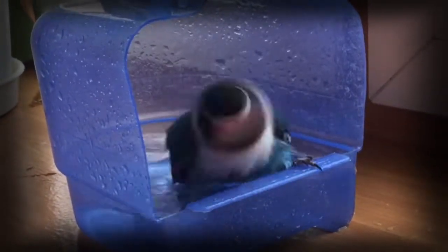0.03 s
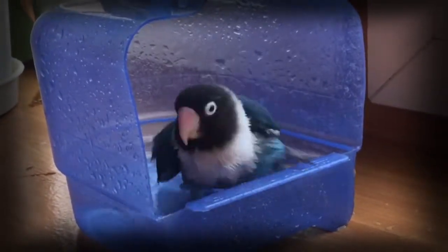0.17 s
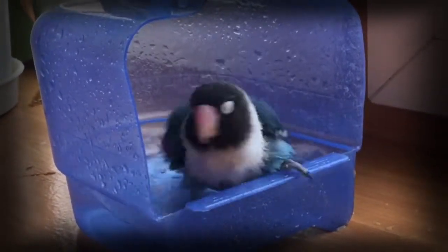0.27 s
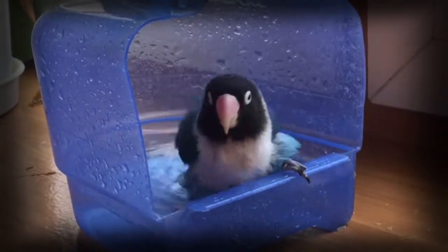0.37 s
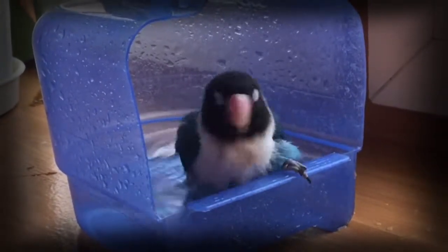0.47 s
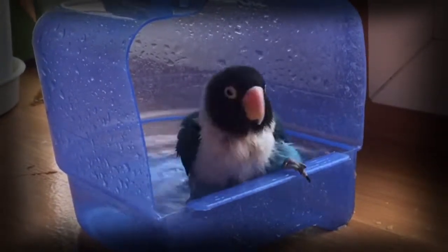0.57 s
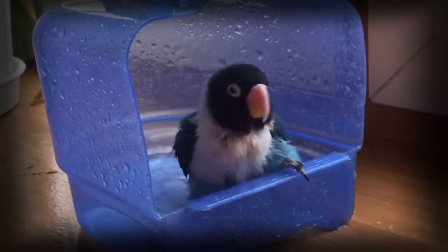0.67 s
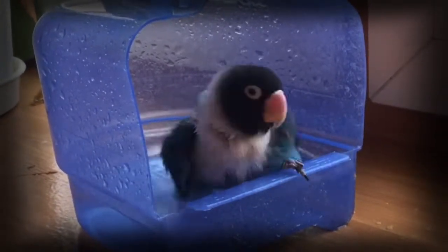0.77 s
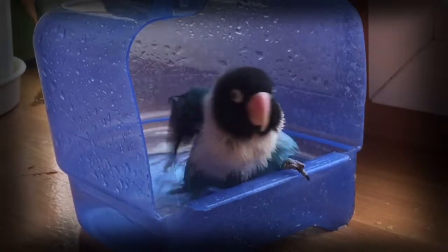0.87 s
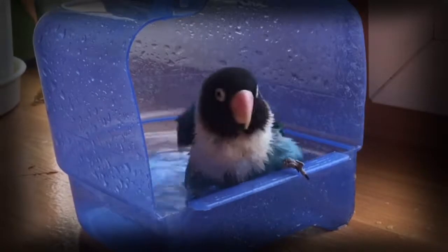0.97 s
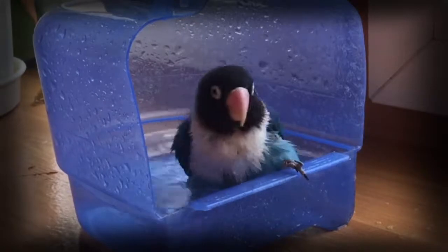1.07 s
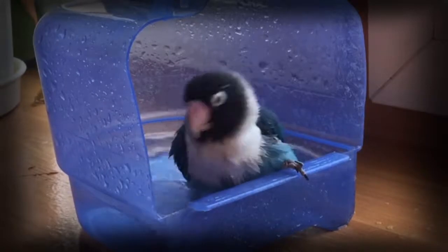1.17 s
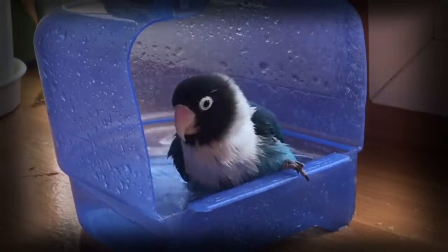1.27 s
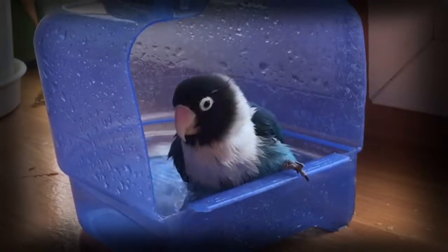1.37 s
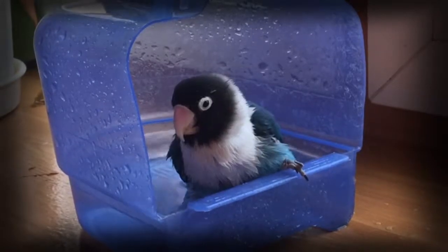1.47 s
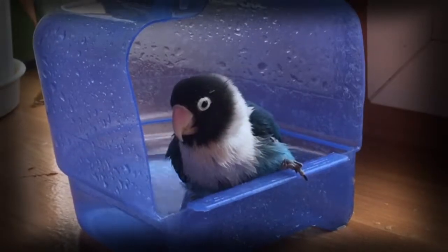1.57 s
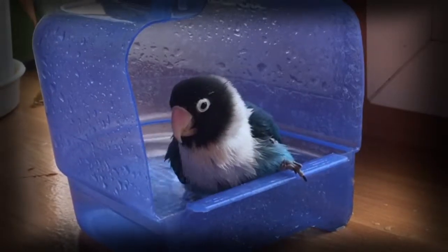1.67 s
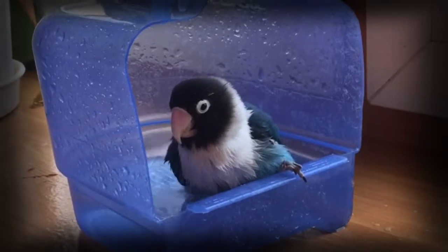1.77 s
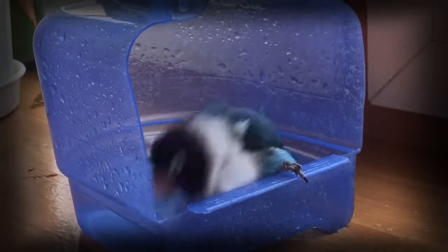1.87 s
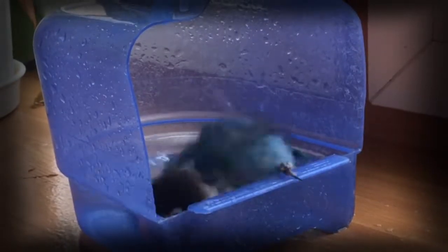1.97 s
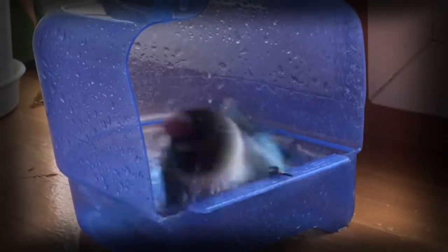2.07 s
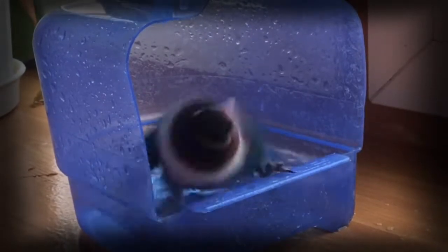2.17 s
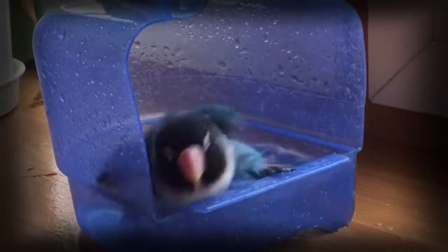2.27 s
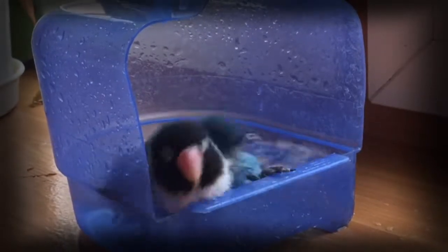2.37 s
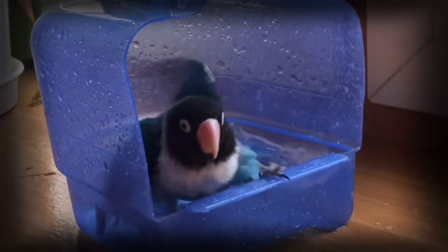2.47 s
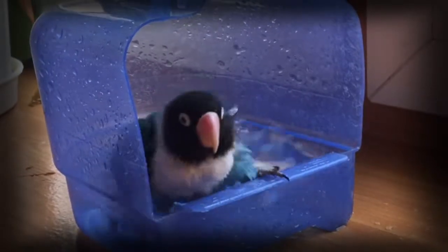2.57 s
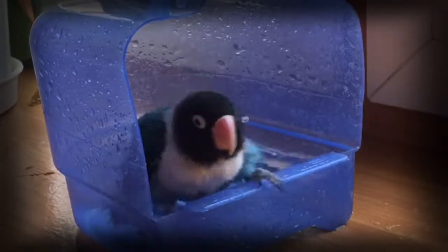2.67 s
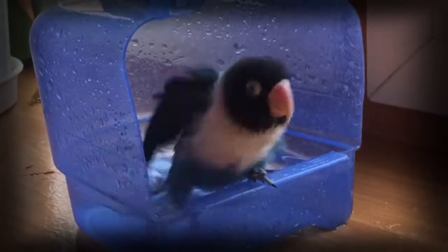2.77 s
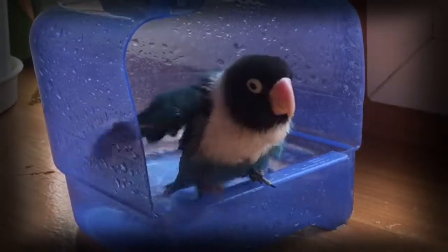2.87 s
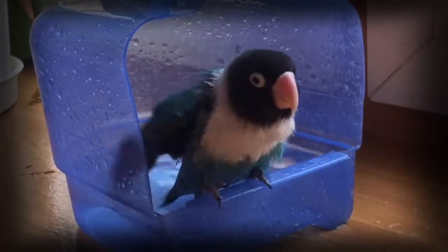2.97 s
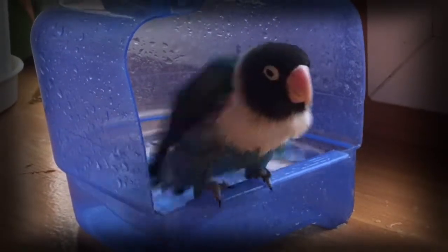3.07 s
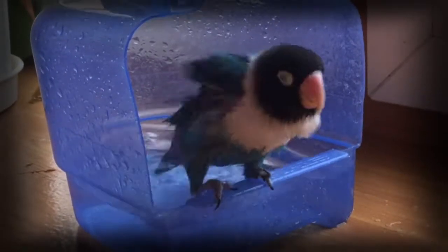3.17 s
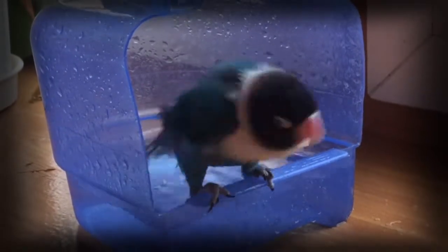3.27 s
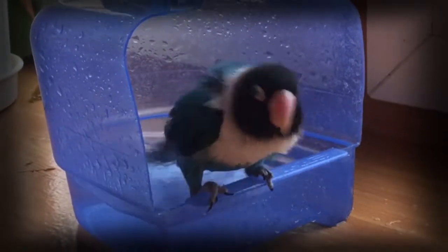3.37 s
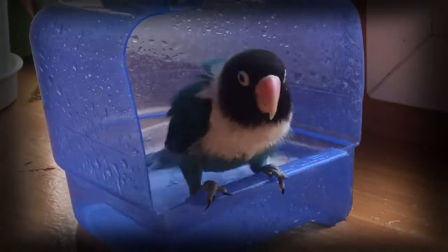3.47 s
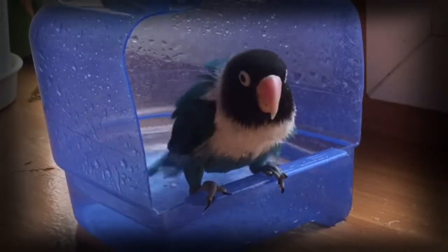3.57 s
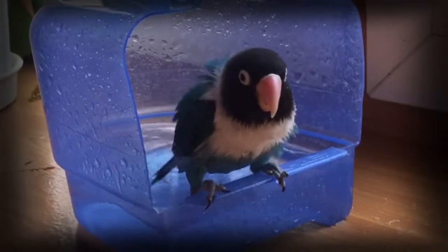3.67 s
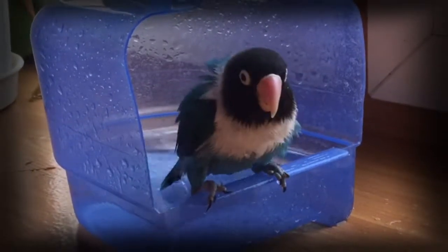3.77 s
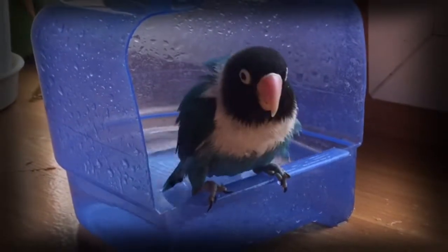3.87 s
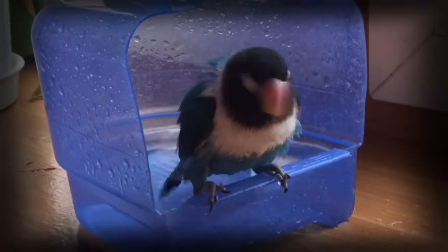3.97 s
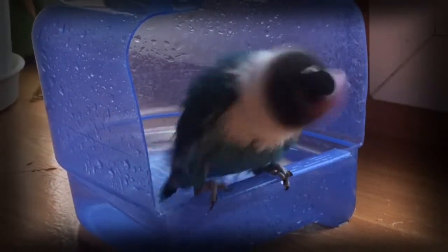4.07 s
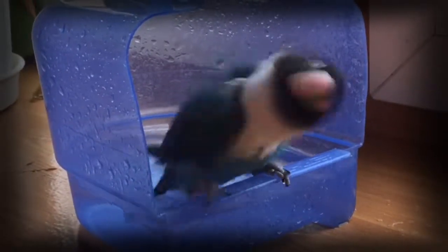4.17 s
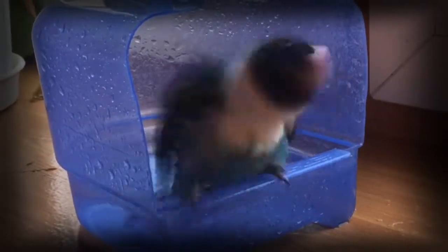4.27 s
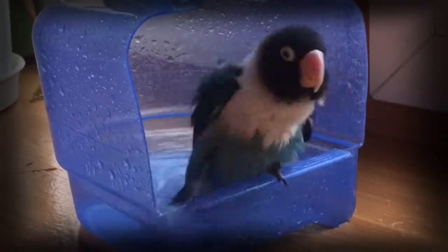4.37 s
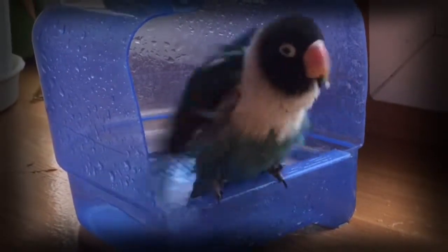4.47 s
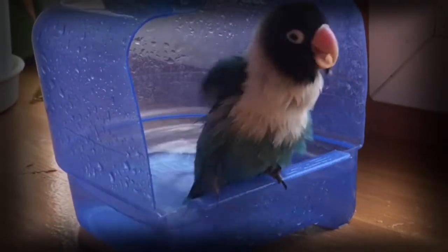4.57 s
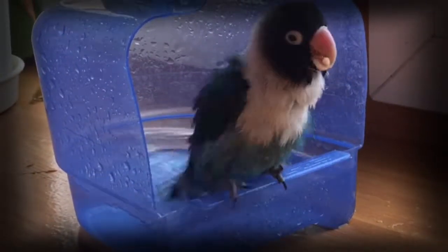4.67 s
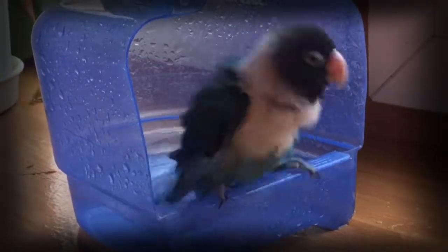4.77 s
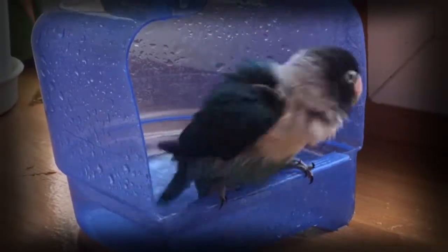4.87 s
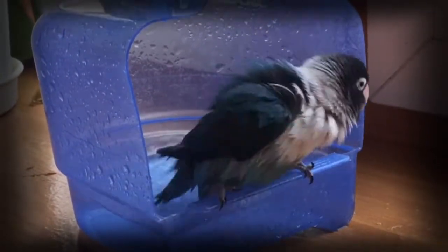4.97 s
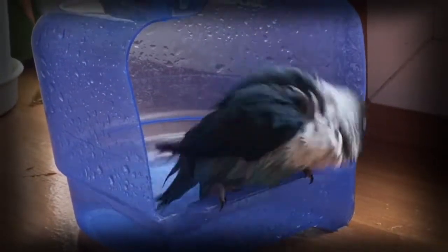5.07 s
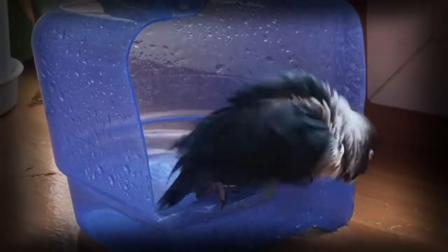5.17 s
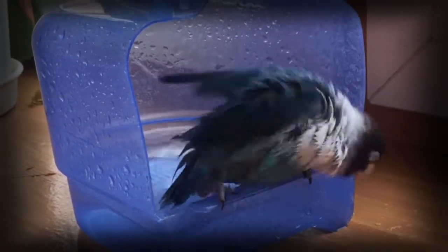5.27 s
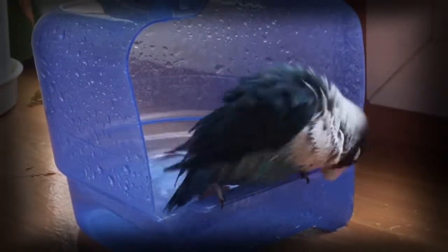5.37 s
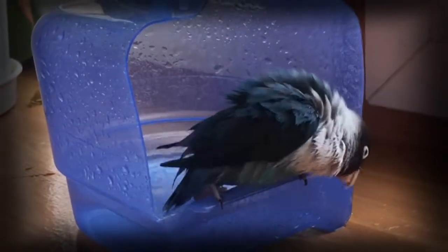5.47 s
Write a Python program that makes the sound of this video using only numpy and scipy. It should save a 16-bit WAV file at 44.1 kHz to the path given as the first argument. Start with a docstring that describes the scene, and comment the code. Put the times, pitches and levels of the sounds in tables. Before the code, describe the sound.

Short bursts of wet flapping and hollow plastic knocks from a bathing pet bird, over faint steady room hum and hiss.

```python
"""A quiet room hums and hisses, with soft thuds through the floor, as a small pet bird bathes
in a hooded plastic tub. Bumps ring the shell as decaying modes; wet slaps and shaken feathers
are noise bursts that fling bright spray; drops plink as short rising bubble tones.
Slosh and patter are lumpy noise that follows the bird's stirring."""
import sys
import numpy as np
from scipy import signal
from scipy.fft import rfft, irfft, next_fast_len
from scipy.io import wavfile
from scipy.ndimage import map_coordinates

SR = 44100
rng = np.random.default_rng(int(sys.argv[2]) if len(sys.argv) > 2 else 0)


def materialize(psi):
    """Save the field psi as 16-bit PCM at rate SR to the path in sys.argv[1].

    A 1-D psi becomes a single channel; in a 2-D psi each row is a channel.
    """
    bounded = np.clip(np.atleast_2d(psi).T, -1, 1)
    quanta = np.round(bounded * 32767).astype(np.int16)
    wavfile.write(sys.argv[1], SR, quanta)


N = 243431


def amp(db):
    """dB to gain."""
    return 10 ** (np.asarray(db) / 20)


def unit(x):
    """Scaled to rms 1."""
    return x / np.sqrt(np.mean(x ** 2) + 1e-20)


def seconds(size):
    """Time axis of size samples, in s."""
    return np.arange(size) / SR


def along(points, hz):
    """(f/Hz, value) points interpolated on a log frequency axis."""
    f, v = np.transpose(points)
    return np.interp(np.log(hz + 1), np.log(f + 1), v)


def curves(rows):
    """One value per sample for each column after the time."""
    s, *cols = np.transpose(rows)
    return [np.interp(seconds(N), s, c) for c in cols]


def wobble(knots_per_s):
    """Smooth random curve through normal-distributed knots."""
    knots = rng.standard_normal(int(N * knots_per_s / SR) + 4)
    return map_coordinates(knots, [np.arange(N) * knots_per_s / SR])


def filtered(x, response):
    """x times a response of frequency."""
    m = next_fast_len(len(x) + 2048)
    spectrum = rfft(x, m) * response(np.fft.rfftfreq(m, 1 / SR))
    return irfft(spectrum, m)[:len(x)]


def noise(spectrum, size=N):
    """Coloured noise of rms 1."""
    white = rng.standard_normal(size)
    return unit(filtered(white, lambda hz: amp(along(spectrum, hz))))


def add(track, s, sound):
    """Lays a sound into the track at s seconds."""
    part = track[round(s * SR):][:len(sound)]
    part += sound[:len(part)]


def fade(t, t60, attack):
    """Quick rise, then 60 dB of decay per t60."""
    return amp(-60 * t / t60) * (1 - np.exp(-t / attack))


def above(db, quiet_db):
    """Level in dB of the power in excess of the quiet level."""
    excess_power = amp(2 * db) - amp(2 * quiet_db)
    return 10 * np.log10(np.maximum(excess_power, 1e-12))


def shaped(x, shape):
    """Noise under an envelope, with peaks near 1."""
    burst = shape * x
    return burst * np.linalg.norm(shape) / np.linalg.norm(burst) / 2


# noise spectra of room hum, steady hiss, low rumble: f/Hz, relative level/dB
HUM_SPECTRUM = [(15, -57.5), (25, -24.5), (107, -5.5), (166, -1), (223, 1.5), (399, -11.5), (525, -16.5),
                (588, -14.5), (750, -21), (1200, -23), (1560, -73), (2640, -120)]
HISS_SPECTRUM = [(300, -8.5), (800, 3), (2700, 2.5), (5500, -2.5), (9600, -4.5), (12500, -9.5), (13300, -7),
                 (13800, -45.5)]
RUMBLE_SPECTRUM = [(25, -18.5), (50, -5), (75, -2), (120, -1), (160, -31.5), (250, -81)]
# soft floor thuds: t/s, peak level/dB, f/Hz
THUDS = [(0.118, -53.5, 71), (.529, -56.5, 114.7), (0.559, -55, 74), (1.04, -61.5, 118),
         (1.073, -57.5, 77.3), (2.11, -60.5, 74), (2.932, -61, 99.4)]
THUD_SWELL_S = .024


def background():
    """Wavering noise for hum, hiss and rumble; each floor thud is a swelling, dying low sine."""
    out = amp(-70 + 2.6 * wobble(2.495)) * noise(HUM_SPECTRUM)
    t = seconds(SR // 3)
    for s, db, hz in THUDS:
        swell = t / THUD_SWELL_S * np.exp(1 - t / THUD_SWELL_S)
        add(out, s, amp(db) * swell * np.sin(2 * np.pi * hz * t))
    hiss = amp(-76.5 + 0.46 * wobble(7.4)) * noise(HISS_SPECTRUM)
    rumble = amp(-77.0 + 2.4 * wobble(3.93)) * noise(RUMBLE_SPECTRUM)
    return out + hiss + rumble


# the bird stirring, also played by shell(): t/s, slosh level/dB, shell murmur level/dB (before the quiet is taken off)
STIR = [(0, -77, -68), (.26, -77, -73), (.81, -78, -74), (1.92, -79, -73), (2.06, -79, -73),
        (2.18, -57, -48), (2.24, -57, -49), (2.37, -70, -60), (2.69, -77, -68), (3.0, -78, -73),
        (3.23, -75, -69), (3.37, -67, -69), (3.47, -71, -66), (3.64, -76, -70), (4.0, -78, -74),
        (4.27, -72, -71), (4.57, -75, -67), (4.8, -77, -73), (5.23, -77, -73), (5.38, -71, -68),
        (5.52, -75, -61)]
# noise spectra of slosh and fine spray (spray also in ruffles()): f/Hz, relative level/dB
SLOSH_SPECTRUM = [(700, -8.5), (1000, 3.5), (1400, -4.5), (1570, 5), (1750, -4), (3000, 1), (5000, -7.5),
                  (7000, -35.5)]
SPRAY_SPECTRUM = [(2500, -19.5), (4500, 15.5), (8000, 14.5), (13000, 12.5), (16000, 4.5)]
QUIET_SLOSH_DB = -79  # no stirring is heard below this
PATTER_DB, PATTER_DB_PER_DB = -76, .95  # spray at a slosh of -70 dB; growth with slosh


def water():
    """Stirred water sloshes in lumps; fine spray patters on the hood, growing with the slosh."""
    slosh_db = above(curves(STIR)[0], QUIET_SLOSH_DB)
    spray_db = PATTER_DB + PATTER_DB_PER_DB * (slosh_db + 70)
    slosh = unit(amp(5.2 * wobble(70)) * noise(SLOSH_SPECTRUM))
    spray = unit(amp(3.6 * wobble(160) + 2.5 * wobble(30)) * noise(SPRAY_SPECTRUM))
    return amp(slosh_db) * slosh + amp(spray_db) * spray


# bumps against the shell: t/s, peak level/dB before the bass cut, upper modes re lower/dB, base t60/s
BUMPS = [(.126, -50.5, 2, .058), (.254, -54, -9, .11), (.308, -38, -2, .058), (1.023, -56.5, 4, .067),
         (2.014, -28, -5, .075), (2.039, -22.5, 4, .07), (2.1, -25, 3, .085), (2.115, -15, 1, .06),
         (2.124, -17, -8, .045), (2.185, -25, 2, .085), (2.255, -28, 9, .058), (2.353, -24, -2, .047),
         (2.381, -28, 2, .06), (2.475, -49, -3, .07), (2.515, -44, -9, .075), (2.549, -37.5, -4, .07),
         (2.663, -45, 3, .05), (2.729, -27, -2.5, .06), (2.927, -26.5, -15, .045), (2.934, -34, -1.5, .06),
         (2.947, -30, -3, .07), (3.323, -39, 4, .052), (3.339, -42, 4, .035), (3.525, -49, -3, .12),
         (3.555, -37, -4.5, .056), (4.187, -49, 8, .1), (4.213, -28, -1, .065), (4.272, -42, 8, .06),
         (4.278, -30.5, -3.5, .075), (4.332, -31, -8, .054), (4.363, -43, 5, .09), (4.518, -38.5, -7, .085),
         (4.732, -57.5, -8, .062), (4.838, -49, 12, .08), (4.867, -34, -1, .064), (5.188, -30, 5, .07),
         (5.257, -49, -9, .075), (5.362, -31.5, -10, .1), (5.374, -28, -5, .07), (5.389, -38, 5, .12),
         (5.419, -35, -1, .085), (5.461, -36, -4, .05), (5.468, -36, -4, .06)]
# shell modes: nominal f/Hz, mean level/dB, share of a bump's base t60
SHELL_MODES = [(121.5, -16.5, 1.8), (182, -15.5, 1.8), (230, -3, 1.99), (266, -3, 1.15),
               (303.2, -2.5, 1.26), (430.1, -3.5, 1.83), (479.2, -1.5, 1.02), (589.3, -3, 0.83),
               (631.6, -5, 0.88), (727, -3, 0.81), (911, -13, 0.62), (1139, -11.5, 0.5),
               (1545, -10.5, 0.46), (1927, -14, 0.31)]
BUMP_RISE_S = .0017
QUIET_MURMUR_DB = -72.5  # no murmur is heard below this


def shell_response(f):
    """Sum of the shell's resonances, each 40 Hz wide, with alternating sign."""
    total = 0
    for k, (hz, db, _) in enumerate(SHELL_MODES):
        total = total + (-1) ** k * amp(db) * 1j * f * 40 / (hz * hz - f * f + 1j * f * 40)
    return total


def shell():
    """Each bump rings the tub's modes at new strengths; the shuffling bird keeps them murmuring."""
    out, t = np.zeros(N), seconds(SR // 4)
    hz, mode_db, share = np.transpose(SHELL_MODES)[:, :, None]
    for s, db, upper_db, t60 in BUMPS:
        strength_luck, pitch_luck = rng.standard_normal((2, len(hz), 1))
        # a harder contact wakes the upper modes
        strength = amp(mode_db + 0.97 * strength_luck + upper_db * (hz > 520))
        phase = 2 * np.pi * hz * (1 + 0.014 * pitch_luck) * t + 1.026 * pitch_luck
        ring = (strength * fade(t, t60 * share, BUMP_RISE_S) * np.sin(phase)).sum(axis=0)
        add(out, s, amp(db) * ring / np.abs(ring).max())
    shuffle = rng.standard_normal(N) * amp(6.7 * wobble(45))
    murmur = unit(filtered(shuffle, shell_response))
    return out + amp(above(curves(STIR)[1], QUIET_MURMUR_DB)) * murmur


# wet slaps: t/s, spray level/dB, spray centre f/Hz, smack re spray/dB,
# spray fall-off below centre/(dB per octave), spike t60/s
SLAPS = [(.0858, -33, 4000, -25, 18, .009), (.0917, -33, 11500, -30.5, 14, .017),
         (.2589, -51, 7800, -11, 12, .011), (.3075, -39, 3280, 9, 12, .011),
         (.589, -59, 8040, -25, 16, .015), (.601, -53, 9000, -23, 8, .011),
         (2.0122, -22, 3470, 0, 15, .006), (2.0745, -25, 4500, -9, 6, .009),
         (2.1125, -28, 5500, 8, 10, .011), (2.15, -33.5, 4170, -15, 14, .014),
         (2.154, -32, 4400, -3, 10, .011), (2.1778, -24, 3100, -3, 16, .007),
         (2.1828, -25, 4500, 2, 4, .011), (2.232, -42, 10000, -3, 5, .013),
         (2.248, -30, 10500, -16, 9, .013), (2.255, -46, 3335, 21, 22, .011),
         (2.297, -47, 9500, -6, 5, .011), (2.3165, -42, 6000, -19, 6, .012),
         (2.3305, -37, 4580, -30, 11, .011), (2.349, -48, 12000, 8, 8, .007),
         (2.3752, -24, 13800, -28, 34, .004), (2.4768, -53, 13300, -6, 6, .012),
         (2.545, -35, 6000, -5, 2, .011), (2.674, -54, 7500, -6, 8, .015),
         (2.7257, -34, 13500, -4, 5, .008), (2.7484, -51, 4050, -10, 6, .011),
         (2.9253, -40, 3700, -9, 5, .006), (2.933, -36, 9000, 5, 9, .008),
         (3.1687, -50, 3300, -12, 25, .02), (3.1935, -45, 7500, -35, 16, .008),
         (3.2064, -42, 8600, -30, 26, .008), (3.3224, -50, 6000, 11, 6, .011),
         (3.328, -38, 4600, -6, 10, .01), (3.3375, -44, 9000, -20, 7, .016),
         (3.5506, -40, 13500, -6, 5, .013), (3.6048, -55, 14100, -10, 18, .011),
         (4.041, -27, 5000, -16, 6, .013), (4.0461, -32, 13910, -20, 10, .007),
         (4.0534, -30, 12500, -38, 8, .016), (4.1923, -52, 4540, 3, 12, .012),
         (4.2605, -56, 9000, -4, 4, .014), (4.2919, -47, 9000, -1, 2, .008),
         (4.3163, -51, 3500, 0, 8, .009), (4.3317, -48, 9000, 0, 3, .01), (4.3497, -42, 7500, -16, 4, .012),
         (4.361, -50, 4000, -4, 11, .01), (4.457, -54, 13000, -4, 4, .013), (4.5154, -45, 4500, 8, 6, .012),
         (4.6095, -58, 5000, 2, 5, .012), (4.7574, -56, 9000, -10, 8, .012),
         (4.7984, -52, 13500, -12, 25, .008), (4.8075, -45, 13500, -11, 20, .008),
         (4.816, -40.5, 13400, -11, 16, .01), (4.827, -43, 13300, -14, 22, .012),
         (4.856, -37, 9800, -35, 20, .011), (4.8677, -39, 14040, 4, 9, .012),
         (4.9352, -40, 9500, -35, 15, .011), (4.9592, -49, 6800, -35, 24, .013),
         (5.1865, -22, 4800, -14, 6, .007), (5.2594, -49.5, 3320, 3, 13, .01),
         (5.296, -52, 4200, -20, 16, .01), (5.375, -45, 3050, 4, 20, .015),
         (5.39, -39.5, 3300, 1, 20, .013), (5.4015, -48, 3910, -3, 14, .011),
         (5.419, -44, 3300, 4, 10, .015), (5.4725, -54, 3130, -8, 22, .016)]
# noise spectrum of a slap's dull part: f/Hz, relative level/dB
SMACK_SPECTRUM = [(600, -8), (1300, 5.5), (2700, -6), (4000, -20.5), (8000, -38), (16000, -33.5)]
# dips that the hood cuts into the slaps: f/Hz, gain/dB
HOOD_DIPS = [(3800, 0), (5300, -5), (7000, 0), (10300, 0), (11500, -6), (12800, 0), (14300, 0), (16000, -8)]
SLAP_RISE_S, TAIL_T60_RATIO, TAIL_DB, HOOD_ECHO_DB = .001, 5, -16, -8.5
FALL_OFF_RATIO = .9  # above the centre over below


def slaps():
    """Spike plus weaker tail: flung spray over a dull smack, combed by an echo off the close hood."""
    out, t = np.zeros(N), seconds(SR // 8)
    for s, db, hz, smack_db, steep_db, t60 in SLAPS:
        tail = amp(TAIL_DB) * fade(t, TAIL_T60_RATIO * t60, SLAP_RISE_S)
        shape = fade(t, t60, SLAP_RISE_S) + tail
        shape = shape / shape.max()
        # three octaves either side of the centre
        fling = [(hz / 8, -3 * steep_db), (hz, 0), (hz * 8, -3 * FALL_OFF_RATIO * steep_db)]
        spray = shaped(noise(fling, size=len(t)), shape)
        smack = shaped(noise(SMACK_SPECTRUM, size=len(t)), shape)
        burst = amp(db) * (spray + amp(smack_db) * smack)
        add(out, s, burst)
        add(out, s + rng.uniform(0.00017, 0.00056), amp(HOOD_ECHO_DB) * burst)
    return filtered(out, lambda f: amp(along(HOOD_DIPS, f)))


# drops that trap a bubble: t/s, level/dB before the envelope, starting f/Hz
DROPS = [(0.086, -28, 3920), (.9595, -42, 4930), (.963, -52, 5900), (.97, -53, 5950), (2.014, -22, 1520),
         (2.074, -21.5, 9240), (2.153, -25.5, 1527), (2.169, -36, 7350), (2.232, -27, 8100),
         (2.248, -23, 9730), (2.254, -35, 2580), (2.262, -24, 3330), (2.404, -49, 4340), (2.434, -55, 3300),
         (2.572, -47, 3640), (3.171, -48, 7840), (3.194, -31.5, 6660), (3.207, -30, 8200),
         (3.214, -57, 1510), (3.232, -44, 10200), (3.253, -53, 1570), (3.304, -46.5, 1610),
         (4.041, -36, 3380), (4.041, -26.5, 6940), (4.362, -46, 2430), (4.519, -40, 1140),
         (4.612, -56, 1570), (4.651, -57, 1640), (4.759, -49, 8200), (4.938, -33, 6700), (4.96, -39, 5950)]
BUBBLE_T60_S, BUBBLE_SHRINK = 0.049, 0.59  # 1 kHz bubble, before collapse; power of pitch that shortens it


def drops():
    """A trapped bubble sings a short tone that rises a little and collapses; small ones sooner."""
    out, t = np.zeros(N), seconds(SR // 8)
    for s, db, hz in DROPS:
        t60 = BUBBLE_T60_S * (hz / 1000) ** -BUBBLE_SHRINK
        collapse = np.exp(-(t / (0.27 * t60)) ** 2)
        tone = np.sin(2 * np.pi * hz * (t + .012 * t * t / t60))
        add(out, s, amp(db) * fade(t, t60, 0.0007) * collapse * tone)
    return out


# feather shakes: start t/s, end t/s, feather level/dB before the swell, spray re feathers/dB
RUFFLES = [(0.092, 0.093, -55, 9), (0.322, 0.411, -70, -26), (0.64, 0.718, -75.5, -20),
           (1.001, 1.073, -80, -21), (3.565, 3.638, -71, -6), (0.588, 0.628, -84, 6),
           (2.019, 2.095, -53, -14), (2.095, 2.207, -50, -5), (2.221, 2.302, -58, -6),
           (2.535, 2.619, -63.5, -9), (3.2, 3.356, -70, -6), (3.327, 3.35, -57, 1.5),
           (3.36, 3.514, -79.5, -7), (4.051, 4.074, -64, 12.5), (4.188, 4.212, -64.5, -4.5),
           (4.285, 4.391, -61.5, -6.5), (4.784, 4.884, -65, -5), (5.205, 5.271, -57.5, -25),
           (5.381, 5.439, -47, -17), (5.453, 5.513, -66, -18)]
# noise spectrum of wet feathers: f/Hz, relative level/dB
FEATHER_SPECTRUM = [(500, -22), (1000, 1), (1350, -9), (1570, 4.5), (1800, -4), (2100, -0.5), (2500, -7),
                    (3100, -2), (3800, -7), (4500, -12), (6000, -24), (9000, -25.5)]


def ruffles():
    """Shaken wet feathers: a grainy flutter that swells and sinks, throwing fine spray."""
    out, t = np.zeros(N), seconds(SR // 4)
    for start, end, db, spray_db in RUFFLES:
        progress = np.minimum(t / (end - start), 1)
        swell = np.abs(np.sin(np.pi * progress ** 0.74)) ** 0.73
        knots = rng.standard_normal(SR // 200)
        grain = unit(amp(3 * map_coordinates(knots, [t * 600])))  # 600 knots/s
        feathers = noise(FEATHER_SPECTRUM, size=len(t))
        spray = amp(spray_db) * noise(SPRAY_SPECTRUM, size=len(t))
        add(out, start, amp(db) * swell * grain * (feathers + spray))
    return out


# reverberation: f/Hz, t60/s
ROOM_T60 = [(200, 0.56), (1000, 0.24), (4000, 0.22), (12000, 0.11)]


def room(x):
    """Noise tails whose frequencies each die at their own speed; a new tail every quarter second."""
    out, step = np.zeros(N), SR // 4
    for start in range(0, N, step):
        hz, t, z = signal.stft(rng.standard_normal(SR // 3), SR, nperseg=256)
        decay = amp(-60 * t / along(ROOM_T60, hz)[:, None])
        tail = signal.istft(z * decay, SR, nperseg=256)[1]
        reply = signal.fftconvolve(x[start:start + step], tail / np.linalg.norm(tail))
        add(out, start / SR + .004, reply)
    return out


def scene():
    """Tub, slaps, feathers and drops in their room, over the water and the background."""
    tub, wet, plinks = shell(), slaps() + ruffles(), drops()
    faint = amp(-23) * plinks  # the hood shields the drops from the room
    near = tub + wet + plinks + room(amp(-13) * tub + amp(-15) * wet + faint)
    # a small tub radiates no deep bass
    near = filtered(near, lambda hz: (1j * hz / (150 + 1j * hz)) ** 4)
    return (near + water() + background())[None]


TOP_HZ, EDGE_WIDTH_HZ = 15900, 300


def record(dry):
    """Band limit: gain falls linearly to zero over the edge width below the top frequency."""
    return filtered(dry[0], lambda hz: np.clip((TOP_HZ - hz) / EDGE_WIDTH_HZ, 0, 1))[None]


dry = scene()
out = record(dry)
materialize(out)
```